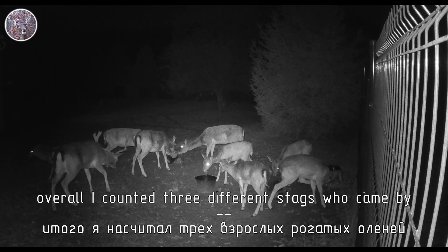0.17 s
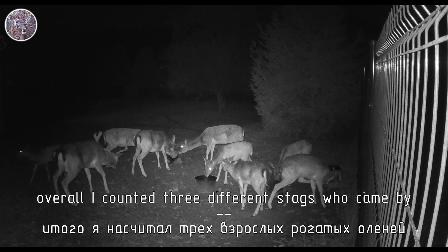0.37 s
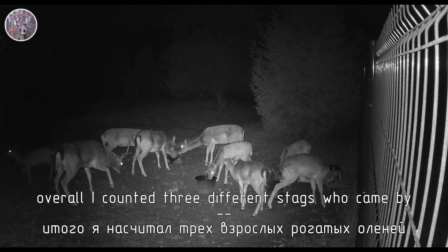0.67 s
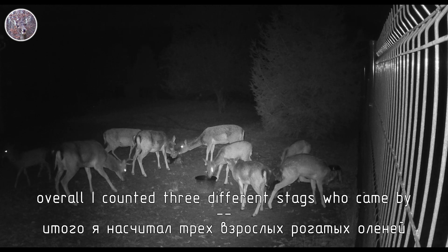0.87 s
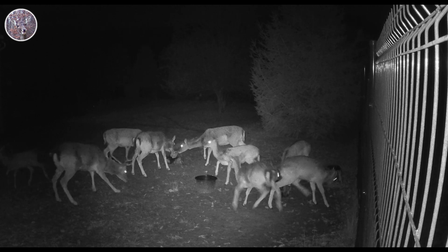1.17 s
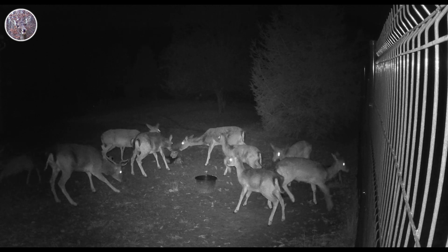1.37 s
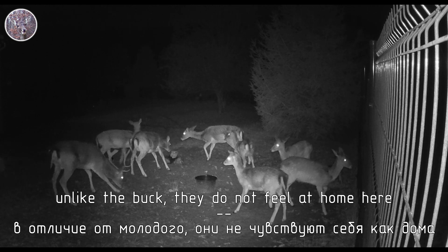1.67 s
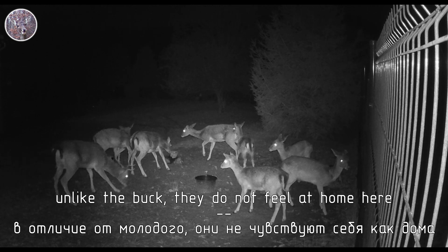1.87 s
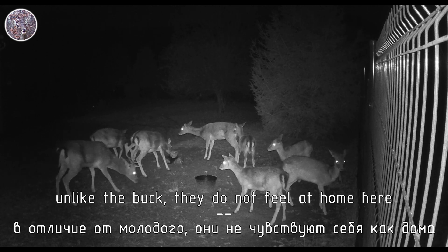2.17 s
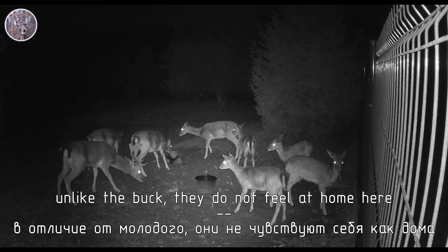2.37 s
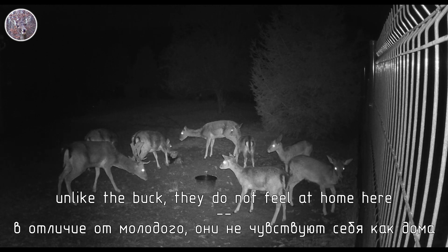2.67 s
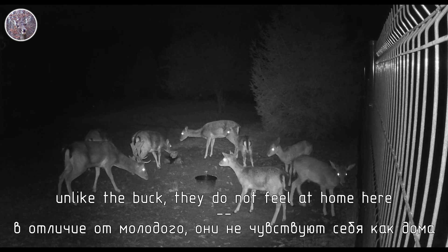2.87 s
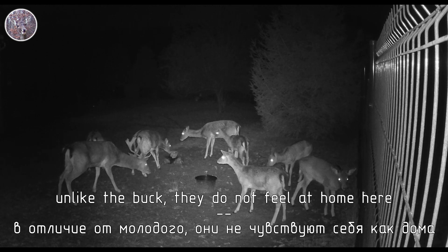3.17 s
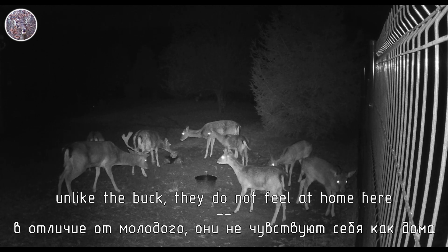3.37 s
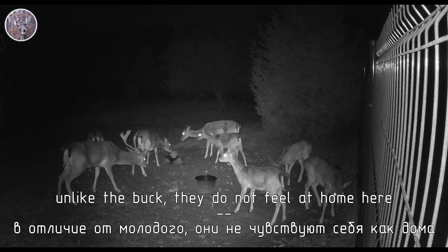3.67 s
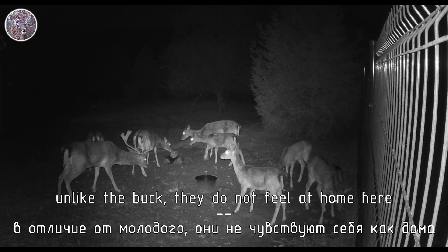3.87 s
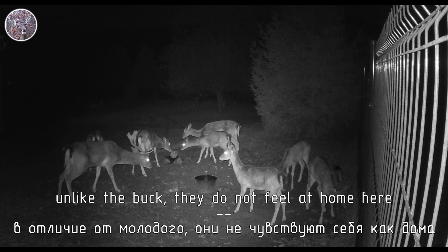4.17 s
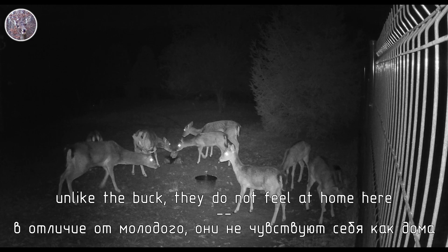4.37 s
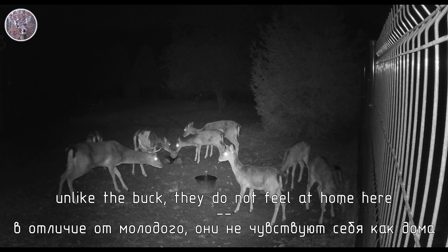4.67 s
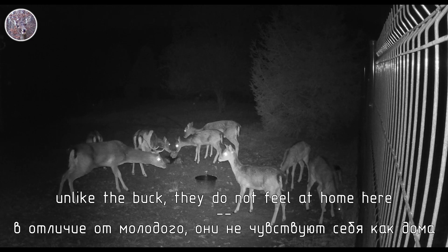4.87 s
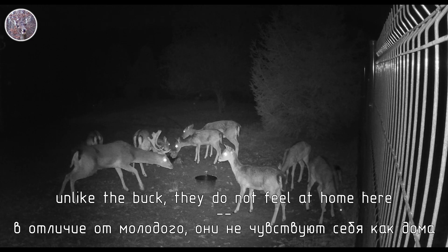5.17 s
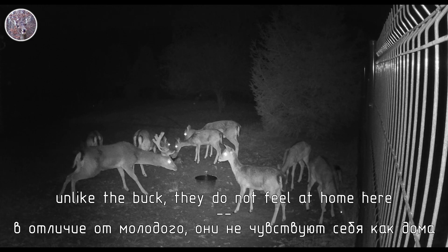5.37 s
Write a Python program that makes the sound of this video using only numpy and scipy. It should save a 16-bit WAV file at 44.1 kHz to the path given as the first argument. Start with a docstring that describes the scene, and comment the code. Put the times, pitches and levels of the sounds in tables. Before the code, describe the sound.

Five throaty, pulsing buck groans, like slow coarse snores or belches, swell quickly and drop in tone as the throat lengthens. Two come first, then a longer gap, then three about a second apart. Woodland echo trails each one. Near the fourth, a thin piercing squeak breaks into rasp. A fixed outdoor microphone picks up quiet, bass-leaning night hiss throughout.

```python
"""A fallow buck groans five times at night, by a steel fence and a forest edge.
Each groan is a slow rattle of vocal-fold snaps ringing a throat that lengthens as the larynx is pulled down,
with a puff of rasp after each snap. Fence, trunks and forest throw the calls back.
Thin whistles and a long squeak are wavering sines, the squeak breaking into hoarse noise; two far hoots sag.
Shaped noise makes the night hiss and the echo of an earlier groan dying away at the start."""
import sys
import numpy as np
from scipy import signal
from scipy.fft import rfft, irfft
from scipy.io import wavfile
from scipy.ndimage import uniform_filter1d

SR = 44100
rng = np.random.default_rng(int(sys.argv[2]) if len(sys.argv) > 2 else 0)


def generate_wav(sig):
    """Save sig (samples, or channels by samples) to the path in sys.argv[1] as 16-bit PCM at SR."""
    pcm = np.round(np.clip(np.atleast_2d(sig).T, -1, 1) * 32767).astype(np.int16)
    wavfile.write(sys.argv[1], SR, pcm)


N = 243873


def gain_of(db):
    """Amplitude factor of a level in dB."""
    return 10 ** (np.asarray(db) / 20)


def evened(x):
    """Scale to rms 1."""
    return x / np.sqrt(np.mean(x ** 2) + 1e-20)


def read(points, hz):
    """A spectrum joined by straight lines on a log-frequency axis."""
    f, value = np.transpose(points)
    return np.interp(np.log(hz + 1), np.log(f + 1), value)


def add(mix, start_s, sound):
    """Mix a sound in at a time, cut at the end of the mix."""
    part = mix[round(start_s * SR):][:len(sound)]
    part += sound[:len(part)]


def noise(spectrum):
    """Noise of rms 1 with the given spectrum."""
    gain = gain_of(read(spectrum, np.fft.rfftfreq(N, 1 / SR)))
    return evened(irfft(rfft(rng.standard_normal(N)) * gain, N))


def waver(size, order):
    """Smooth chance of rms 1 that changes about every `order` samples."""
    return evened(signal.fftconvolve(rng.standard_normal(size), np.hanning(2 * order), "same"))


def dying_echo(level_db=-51, fall_db_per_s=48):
    """At the start an earlier groan is still fading among the trees: coloured noise in steady decay."""
    colour = [(150, -15.5), (400, -12.5), (620, 0.5), (850, -23.5),
              (1030, 7.5), (1250, -24.5), (1600, -23.5), (4000, -56)]
    return noise(colour) * gain_of(level_db - fall_db_per_s * np.arange(N) / SR)


def night_hiss(level_db=-64):
    """Steady noise of night air and microphone, strongest in the bass and low mids."""
    # hiss spectrum: (frequency [Hz], relative density [dB])
    hiss_spectrum = [(25, -2), (62, -4), (110, -11), (170, -11), (250, -3), (640, 0), (850, -8), (1050, -7),
                     (1600, -18), (3200, -24), (5000, -31), (8300, -31), (9600, -39), (15700, -39)]
    return gain_of(level_db) * noise(hiss_spectrum)


def whistle(hz, wobble, taper):
    """A nearly pure, slightly unsteady tone on a pitch curve, faded in and out."""
    pitch_hz = hz * (1 + wobble * waver(len(hz), order=120))
    tone = np.sin(2 * np.pi * np.cumsum(pitch_hz) / SR)
    return evened(tone) * signal.windows.tukey(len(hz), taper)


def thin_whistles(warble=.018):
    """Short high tones whose pitch warbles by a small share of itself."""
    # thin whistles: (start [s], length [s], mean pitch [Hz], level [dB], warble rate [1/s])
    whistle_table = [(.24, .24, 8650, -96, 7.5), (1.09, 0.444, 5690, -86.5, 5), (1.07, 0.32, 6550, -93, 5),
                     (2.70, .12, 8750, -94.5, 6), (5.29, 0.13, 7920, -81, 6)]
    out = np.zeros(N)
    for start_s, length_s, hz, db, rate_hz in whistle_table:
        t = np.arange(0, length_s, 1 / SR)
        pitch_hz = hz * (1 + warble * np.sin(2 * np.pi * rate_hz * t))
        add(out, start_s, gain_of(db) * whistle(pitch_hz, wobble=.0053, taper=.2))
    return out


def far_hoots(sag_hz_per_s=650):
    """Brief low tones, unsteady and sagging in pitch."""
    # far hoots: (start [s], length [s], pitch at the start [Hz], level [dB])
    hoot_table = [(0.285, 0.069, 584, -56), (1.151, 0.072, 565.1, -51.5)]
    out = np.zeros(N)
    for start_s, length_s, hz, db in hoot_table:
        t = np.arange(0, length_s, 1 / SR)
        add(out, start_s, gain_of(db) * whistle(hz - sag_hz_per_s * t, wobble=0.0453, taper=.9))
    return out


def ring(gain):
    """The causal, minimum-phase ring of a body with this gain spectrum."""
    both_sides = np.r_[gain, gain[-2:0:-1]]
    log_gain = np.log(np.maximum(both_sides, gain.max() * 1e-5))
    return np.fft.ifft(np.exp(np.conj(signal.hilbert(log_gain)))).real


def resonances(table, hz, pull, round_hz, extra_db=0, scatter=0.022, skirt_hz=213, valley_db=-34):
    """Gain spectrum (rms 1) of resonances that shift as the larynx sinks; small round_hz softens attack."""
    up_hz, down_hz, width_hz, up_db, down_db = np.transpose(table)
    centre_hz = up_hz + (down_hz - up_hz) * pull
    centre_hz = centre_hz * (1 + scatter * rng.standard_normal(len(up_hz)))
    off_hz = hz[:, None] - centre_hz
    peaks = 1 / np.hypot(1, 2 * off_hz / width_hz) / np.hypot(1, off_hz / round_hz) + gain_of(valley_db)
    peaks *= gain_of(up_db + (down_db - up_db) * pull + extra_db) / (1 + (off_hz / skirt_hz) ** 2)
    return evened(np.linalg.norm(peaks, axis=1))


def puff(length_s):
    """A short burst of turbulence of energy 1."""
    t = np.arange(SR // 40) / SR
    burst = rng.standard_normal(len(t)) * t * np.exp(-2 * t / length_s)
    return burst / np.linalg.norm(burst)


def effort(age_s, first_db, full_db, swell_s, slack_db):
    """Level in dB of each snap: the groan swells, shifts in effort midway, then lets go."""
    swell_curve = 2.34  # steep at first, then levels off
    slack_at_s, slack_s = 0.1876, 0.0436
    release_s, release_db = 0.077, -9
    swell = (first_db - full_db) * np.maximum(1 - age_s / swell_s, 0) ** swell_curve
    slack = slack_db * np.exp(-((age_s - slack_at_s) / slack_s) ** 2)
    release = release_db * np.maximum(1 - (age_s[-1] - age_s) / release_s, 0)
    return full_db + swell + slack + release


def rasp(hz, at_s, age_s, pull, tilt_db, open_s, buzz_s=0.088, puff_s=0.004, round_hz=300):
    """A puff of air after a snap sounds the upper resonances, brightening as the mouth opens."""
    # upper resonances: (larynx up [Hz], larynx down [Hz], width [Hz], level up [dB], level down [dB])
    upper_throat = [(2126, 1751, 61, 8, 9.5), (2790, 2330, 27, -11, -3), (3570, 2822, 270, -4.5, -19.5),
                    (3960, 3368, 370, -16, -18), (3950, 3700, 200, -19, -22)]
    # momentary buzz in an upper resonance: (time [s], frequency [Hz], boost [dB])
    buzz_table = [(0.761, 3406, 13), (1.53, 3120, 19.5), (1.679, 2230, 7), (1.7, 3890, 6.5),
                  (4.04, 4350, 10), (5.109, 2330, 10), (5.15, 2845, 19)]
    shut_db, dull_db_per_octave = -9, -12.5  # weaker with the larynx up, duller at the onset
    buzz_db = sum(db * np.exp(-((at_s - s) / buzz_s) ** 2 - ((hz - f) / 220) ** 2)
                  for s, f, db in buzz_table)
    octaves = np.log2(np.clip(hz, 2000, 5000) / 2000)
    slope_db = tilt_db + dull_db_per_octave * max(1 - age_s / open_s, 0)
    gain = resonances(upper_throat, hz, pull, round_hz)
    gain = gain * gain_of(shut_db * (1 - pull) + slope_db * octaves + buzz_db)
    return pull ** 0.82 * signal.fftconvolve(ring(gain), puff(puff_s))


def groan(rattle, gesture, push, uneven_db=2.0, soft_hz=60, sharp_hz=220, chest_round_hz=45,
          jitter_s=.0004, rough=0.59, flutter_s=0.0052):
    """Slack vocal folds snap about forty times a second, fastest midway; each snap rings the throat."""
    # chest tone: (larynx up [Hz], larynx down [Hz], width [Hz], level up [dB], level down [dB])
    chest_tone = [(249, 259.8, 34, -6.5, -5), (120, 100, 15, -29, -20.5)]
    # throat resonances: same columns as the chest tone
    lower_throat = [(436.9, 402.2, 20, -12.5, -6.5), (751, 629.3, 27, -7, 4.5),
                    (1123, 1006.4, 36.3, 6.5, -0.5), (1610.4, 1200, 11, -24, -11)]
    # folds let go with a harder, sharper snap: (time [s], boost [dB])
    hard_snaps = [(.539, 6), (.629, 5), (1.648, 5), (1.697, 6), (2.828, 5), (3.008, 8), (3.058, 6.5),
                  (3.972, 6), (4.134, 6), (4.182, 8), (4.907, 4)]
    pull_curve = 1.805  # larynx lingers, then is drawn down
    catch_db, chest_shut_db = -1.5, -23.5  # snap held back before a hard one; chest with larynx up

    start_s, count, first_rate_hz, last_rate_hz, arch_hz = rattle
    pull_s, depth, first_db, third_db, fourth_db = gesture
    *swell, chest_db, rasp_db, tilt_db, open_s = push
    u = np.linspace(0, 1, count - 1)
    rate_hz = first_rate_hz + (last_rate_hz - first_rate_hz) * u + arch_hz * (1 - (2 * u - 1) ** 2)
    ages_s = np.r_[0, np.cumsum(1 / rate_hz)]
    hz = np.fft.rfftfreq(2048, 1 / SR)
    out = np.zeros(N)
    for age_s, effort_db in zip(ages_s, effort(ages_s, *swell)):
        at_s = start_s + age_s + jitter_s * rng.standard_normal()
        hard = gain_of(sum(db for when, db in hard_snaps if abs(when - at_s) < .01))
        caught = any(.01 < when - at_s < .035 for when, db in hard_snaps)
        size = gain_of(catch_db * caught + uneven_db / hard * rng.standard_normal())
        size = size * np.sqrt(SR / rate_hz.mean())  # unit-energy snaps make a train of rms about 1
        pull = depth * (1 - np.exp(-(age_s / pull_s) ** pull_curve))
        round_hz = soft_hz + (sharp_hz - soft_hz) * pull  # first snaps are soft and pure

        extra_db = np.array([first_db, 0, third_db * (1 - pull), fourth_db * (1 - pull)])
        throat = resonances(lower_throat, hz, pull, round_hz * hard, extra_db)
        throat = hard * gain_of(effort_db) * throat
        chest = resonances(chest_tone, hz, pull, chest_round_hz)
        chest = gain_of(chest_db + chest_shut_db * (1 - pull) ** 2) * chest
        low_cut = hz ** 2 / (hz ** 2 + 85 ** 2)
        snap = size * ring(np.hypot(throat, chest) * low_cut)
        add(out, at_s, snap)

        flutter = signal.fftconvolve(snap, puff(flutter_s))  # folds flutter as the groan deepens
        add(out, at_s, rough * pull / hard * flutter)
        breath = rasp(hz, at_s, age_s, pull, tilt_db, open_s)
        add(out, at_s, size * hard * gain_of(rasp_db) * breath)
    return out


def buck(trim_db=-4.5):
    """Five groans, each with its own rhythm, larynx pull and push of breath."""
    # rhythm: (start [s], snaps [count], first rate [1/s], last rate [1/s], extra rate midway [1/s])
    rattles = [(.461, 14, 36.8, 38.6, 7.5), (1.3675, 16, 36.3, 38, 8.5), (2.7245, 16, 36.1, 38.2, 7.9),
               (3.87, 14, 37.6, 42, 3.6), (4.7757, 18, 35, 37.8, 7.5)]
    # larynx pull: (time [s], depth [about 0-1], first throat resonance throughout [dB],
    # third at the onset [dB], fourth at the onset [dB])
    gestures = [(0.127, 1.005, -0.5, -19, -7), (0.1384, 1.04, 3, -2, 8), (0.14, 0.9216, 2.5, -12, 5),
                (0.1291, 0.8944, 2.5, -6, -1), (0.14, 0.971, -1.5, 5.5, -1)]
    # push, levels ahead of the trim: (first snap [dB], full level [dB], swell [s], change midway [dB],
    # chest tone [dB], rasp [dB], rasp tilt [dB/octave], time for the rasp to brighten [s])
    pushes = [(-43, -23, 0.084, -4.5, -33.5, -53, 1.5, .36),
              (-56.5, -21.5, 0.084, -7.5, -49, -49.5, 3.5, 0.4),
              (-48.5, -25, 0.22, 0.5, -35.5, -47.5, -1, .33), (-51.5, -24, 0.13, -3, -36.5, -49.5, 0, .08),
              (-47.5, -23.5, 0.1636, 0, -34.5, -43, -2, 0.47)]
    return gain_of(trim_db) * sum(groan(*g) for g in zip(rattles, gestures, pushes))


def surroundings(x, tail_db=-1.0, build_s=0.02, far_db=-24, far_s=0.528, far_spread_s=0.027,
                 far_hz=1040, far_width_hz=90):
    """Single echoes from close by, a tail that builds among the trees, a narrow-band far-wood echo."""
    # forest decay: (frequency [Hz], t60 [s])
    decay_t60 = [(120, .5), (260, .5), (450, 0.743), (700, 1.04), (1100, 0.66), (2000, 0.74), (4000, 0.43),
                 (8000, 0.65)]
    # forest tail colour: (frequency [Hz], level [dB])
    tail_colour = [(120, -3), (260, -9), (500, 4.5), (650, -7), (850, 5), (1050, -5.5), (1300, 8.5),
                   (1600, -8), (3000, 10), (8000, -9)]
    # fence and near trunks: (delay [s], level [dB])
    near_echoes = [(.023, -10.5), (.038, -10.5), (.048, -12.5), (0.068, -18.5), (.089, -16.5),
                   (.141, -23.5), (.228, -24), (0.287, -36.5)]
    size = SR  # one second of response
    taps = rng.standard_normal(size) * (rng.random(size) < 1500 / SR)  # about 1500 reflections per s
    hz, t, z = signal.stft(taps, SR, nperseg=512)
    hz = hz[:, None]

    swell = 1 - np.exp(-(t / build_s) ** 3)
    decay = gain_of(-60 * t / read(decay_t60, hz))
    tail = signal.istft(z * swell * decay, SR)[1][:size]
    colour_db = read(tail_colour, np.fft.rfftfreq(size, 1 / SR))
    tail = irfft(rfft(tail / np.linalg.norm(tail)) * gain_of(tail_db + colour_db), size)

    far = z * np.exp(-((t - far_s) / far_spread_s) ** 2)
    far /= np.linalg.norm(signal.istft(far, SR)[1])
    far_band = 1 + ((hz - far_hz) / far_width_hz) ** 2
    response = tail + gain_of(far_db) * signal.istft(far / far_band, SR)[1][:size]

    for delay_s, db in near_echoes:
        add(response, delay_s, gain_of(db) * np.hanning(7) / 3)
    return signal.fftconvolve(x, response)[:N]


def squeak(tone_db=-84.5, squeal_tone_db=-11.5, rise_db_per_s=448.5, fall_db_per_s=600):
    """A long gliding squeak that breaks into a hoarse squeal near its pitch peaks."""
    # hoarse squeal spectrum: (frequency [Hz], level [dB])
    squeal_band = [(6600, -20.5), (7000, -17.5), (7350, -2), (7900, 7), (8550, -2.5), (8850, -18),
                   (9200, -40)]
    # squeak pitch: (time [s], pitch [Hz])
    glide = [(3.7, 5810), (3.77, 7050), (3.81, 6200), (3.87, 6000), (3.93, 7410), (3.98, 7490), (4.1, 7040),
             (4.135, 6100), (4.26, 5550)]
    # squeals: (start [s], length [s], level [dB])
    squeal_table = [(3.76, .02, -77), (3.945, 0.1448, -57)]
    t = np.arange(N) / SR
    strain = np.zeros(N)
    for start_s, length_s, db in squeal_table:
        rise_db = rise_db_per_s * np.maximum(start_s - t, 0)
        fall_db = fall_db_per_s * np.maximum(t - start_s - length_s, 0)
        strain += gain_of(db - rise_db - fall_db)
    time_s, hz = np.transpose(glide)
    pitch_hz = np.interp(np.arange(time_s[0], time_s[-1], 1 / SR), time_s, hz)
    tone = np.zeros(N)
    add(tone, time_s[0], whistle(pitch_hz, wobble=.007, taper=.1))
    hoarse = noise(squeal_band) * gain_of(1.6 * waver(N, order=250))
    # squeal_tone_db: tone within a squeal, relative to the hoarse part
    return strain * hoarse + (gain_of(tone_db) + gain_of(squeal_tone_db) * strain) * tone


def scene():
    """All calls with their echoes, over the night hiss and the dying echo."""
    calls = buck() + thin_whistles() + far_hoots() + squeak()
    return (calls + surroundings(calls) + dying_echo() + night_hiss())[None]


def record(dry, grit_db=-58, hollow_hz=160, hollow_width_hz=18, hollow_db=-8, edge_hz=15750):
    """A hollow in the bass, a faint hiss that rises with the sound, then a band limit."""
    hz = np.fft.rfftfreq(N, 1 / SR)
    hollow = hollow_db * np.exp(-((hz - hollow_hz) / hollow_width_hz) ** 2)
    heard = irfft(rfft(dry) * gain_of(hollow), N)
    loudness = np.sqrt(abs(uniform_filter1d(dry[0] ** 2, 400)))
    grit_spectrum = [(1000, -3.5), (3700, -6.5), (5000, 6), (7000, -14.0),
                     (8300, 3), (9200, -14), (15000, -28.0)]
    grit = gain_of(grit_db) * loudness * noise(grit_spectrum)
    low_pass = signal.firwin(511, edge_hz, window=("kaiser", 9), fs=SR)
    return signal.oaconvolve(heard + grit, low_pass[None], "same")


dry = scene()
out = record(dry)
generate_wav(out)
```